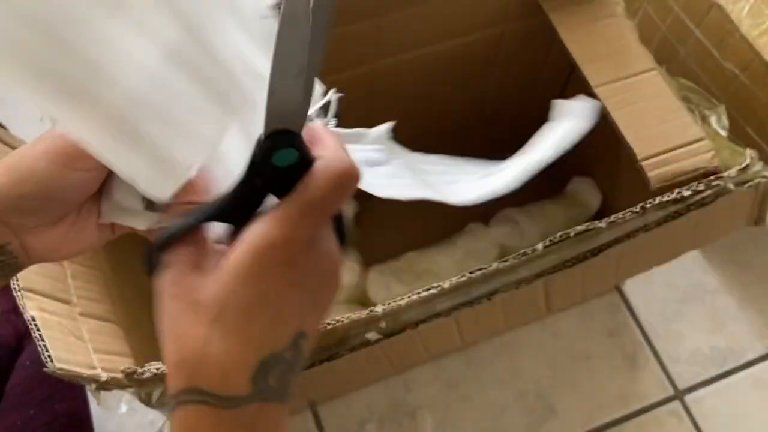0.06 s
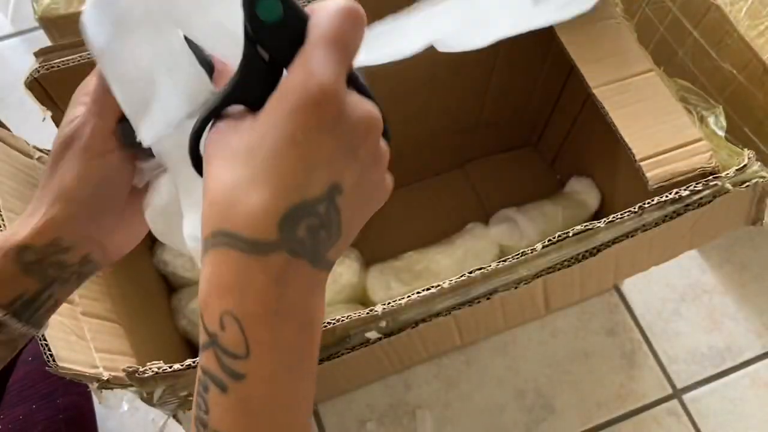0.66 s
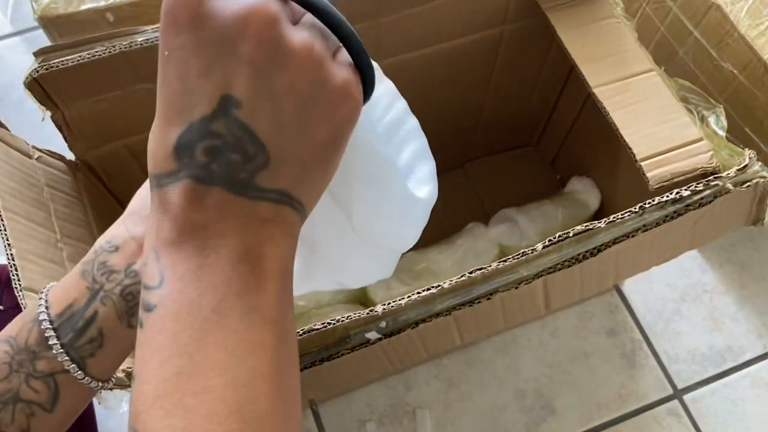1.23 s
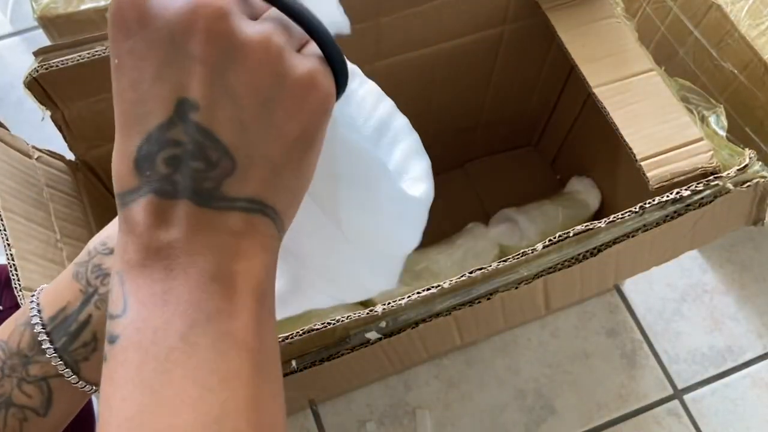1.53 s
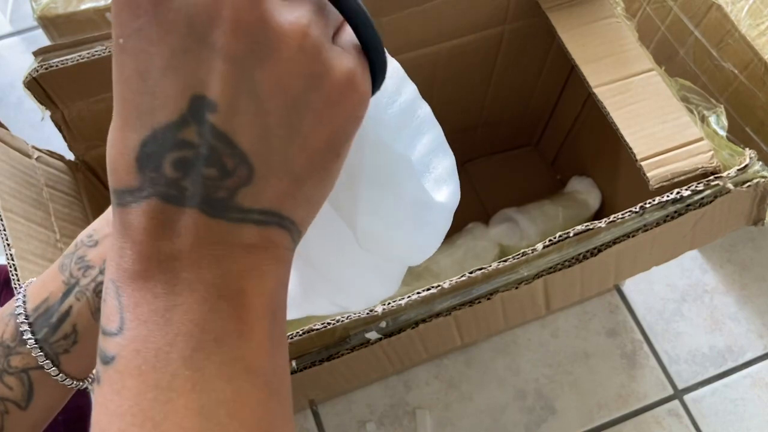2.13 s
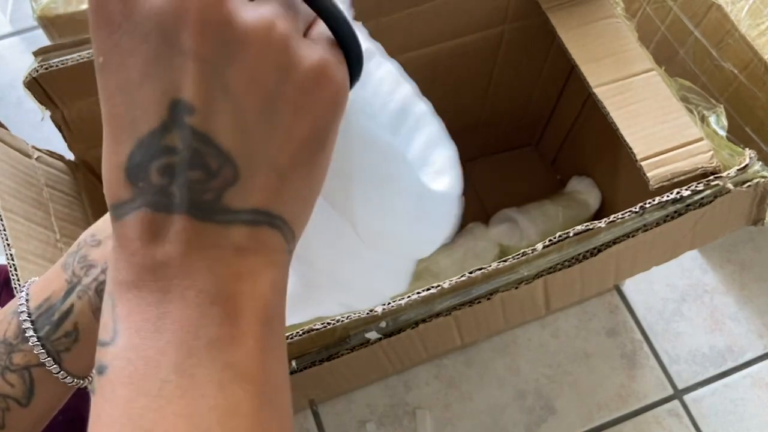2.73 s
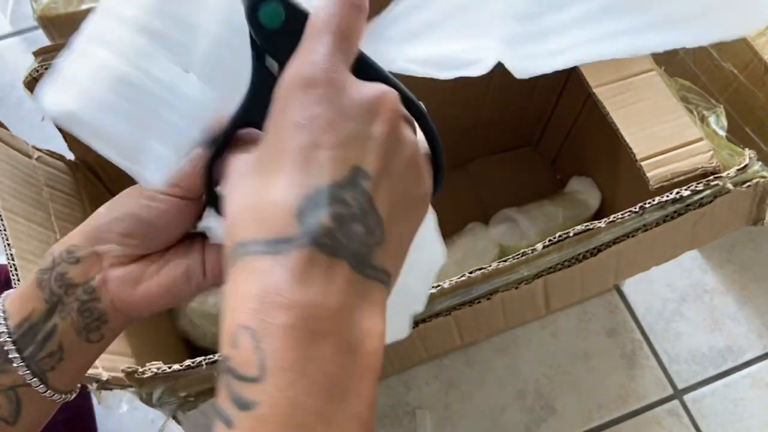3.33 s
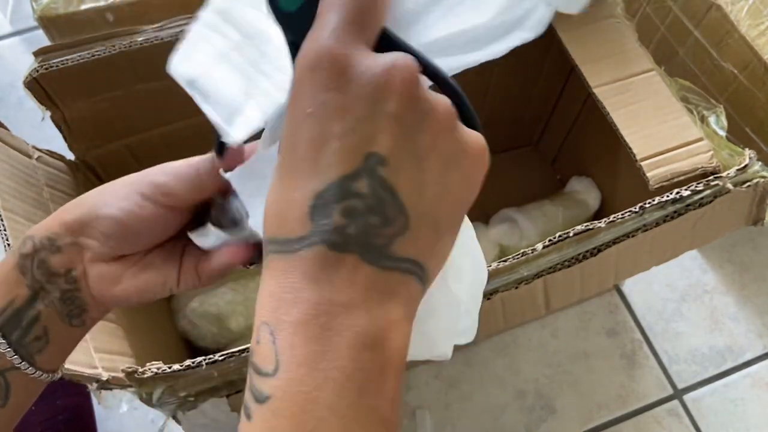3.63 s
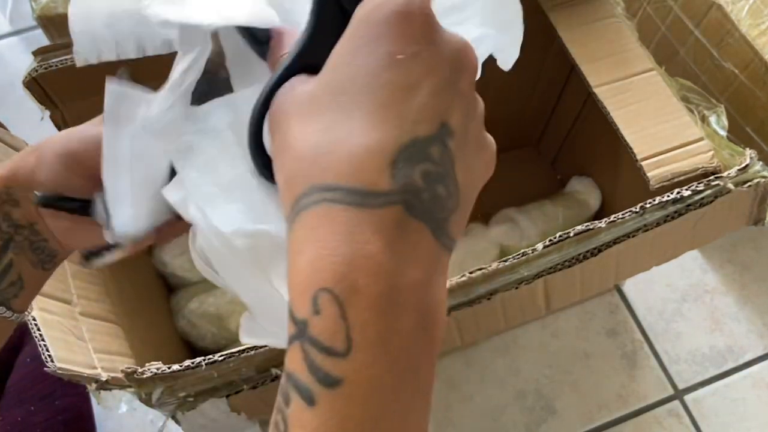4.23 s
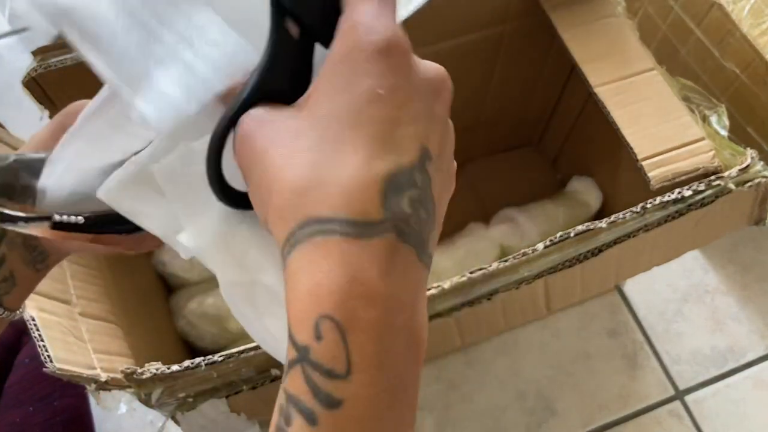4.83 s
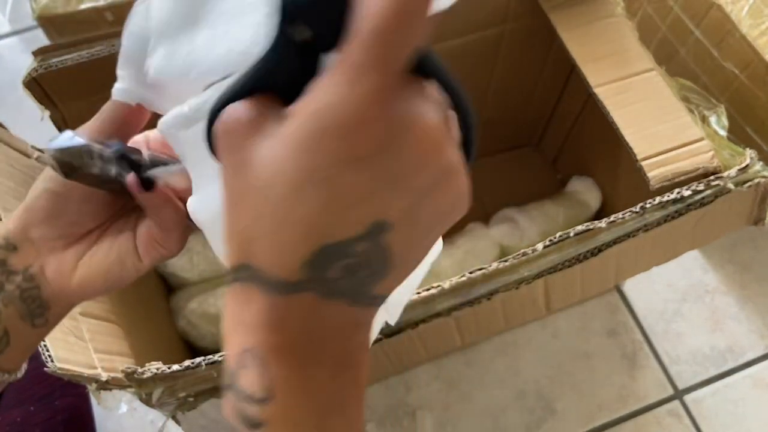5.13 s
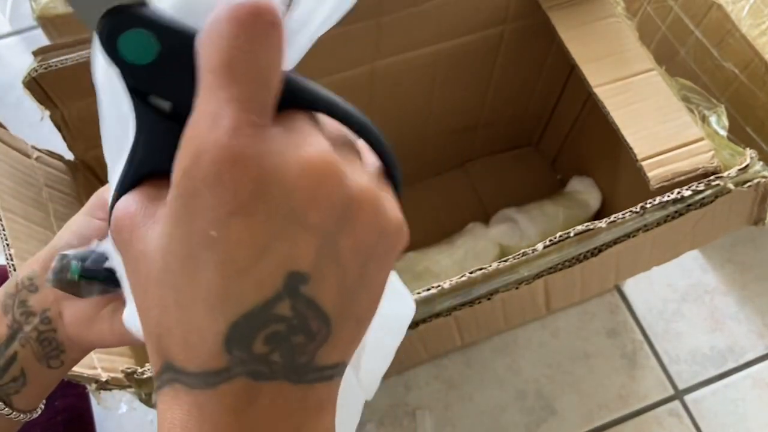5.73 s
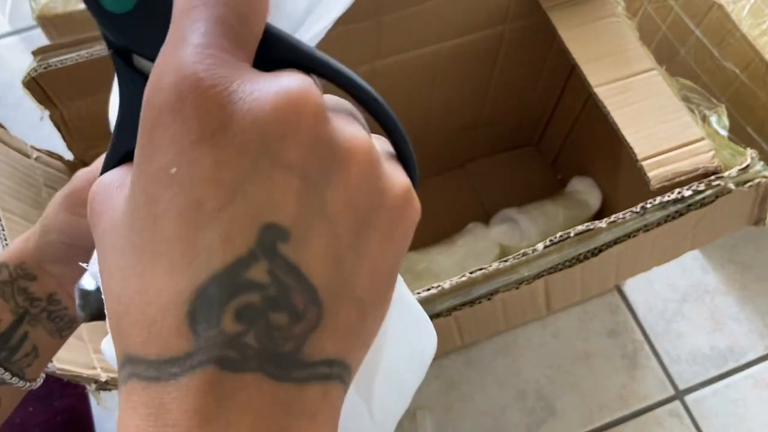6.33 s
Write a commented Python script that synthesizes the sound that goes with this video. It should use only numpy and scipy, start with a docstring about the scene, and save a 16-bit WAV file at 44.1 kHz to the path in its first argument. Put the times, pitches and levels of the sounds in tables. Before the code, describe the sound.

Hands pull and cut packing wrap in uneven, crackly rustles, with short scissor rasps and light knocks over a low rumble.

```python
"""Soft packing wrap rustles and crinkles over a low rumble of moving hands and a small room.
The wrap is snipped with scissors and worked off an item above a cardboard box. It rubs in tiny slips,
creases snap, blades and wrap rasp in short slides, slack folds pop over, and the item and scissors
tap hollowly. The box and the room ring a little, and the two microphone openings of a nearby phone
spread the sound between left and right."""
import sys
import numpy as np
from scipy import signal
from scipy.fft import rfft, irfft, next_fast_len
from scipy.io import wavfile
from scipy.ndimage import uniform_filter1d, map_coordinates

SR = 44100
rng = np.random.default_rng(int(sys.argv[2]) if len(sys.argv) > 2 else 0)


def transcribe(signal):
    """Save signal, clipped to [-1, 1], as a 16-bit WAV file at the path in sys.argv[1]."""
    frames = np.atleast_2d(signal).T
    limited = np.clip(frames, -1, 1)
    pcm = np.round(limited * 32767).astype(np.int16)
    wavfile.write(sys.argv[1], SR, pcm)


N = 280638
TIME = np.arange(N) / SR
FFT_SIZE = next_fast_len(N, True)
FREQS = np.maximum(np.fft.rfftfreq(FFT_SIZE, 1 / SR), 1)

# Levels compare the rows of one table; the functions set the final loudness.
# light rubbing of the held wrap between pulls: (time [s], level [dB])
LIGHT_RUB = [(0.0, -51), (0.33, -52.5), (0.52, -50), (0.88, -50.5), (0.96, -52.5), (1.0, -58),
             (1.06, -50.5), (1.13, -54), (1.4, -46), (1.64, -51.5), (1.72, -45.5), (1.79, -54), (1.88, -48),
             (2.02, -49), (3.18, -53), (3.54, -50.5), (4.08, -46), (4.25, -57), (4.72, -49), (5.1, -49.5),
             (5.2, -56), (5.8, -59), (5.9, -67), (6.0, -52.5), (6.12, -64.5), (6.2, -59), (6.36, -58)]
# pulls on the wrap, each swelling and dying away: (peak time [s], rise [s], fall [s], level [dB])
PULLS = [(0.165, 0.037, 0.039, -36.5), (0.227, 0.022, 0.051, -38), (0.384, 0.013, 0.02, -43),
         (0.43, 0.051, 0.029, -49.5), (0.595, 0.059, 0.05, -42.5), (0.7, 0.029, 0.14, -43.5),
         (0.854, 0.019, 0.025, -43.5), (1.181, 0.026, 0.025, -35.5), (1.33, 0.054, 0.02, -40.5),
         (1.42, 0.028, 0.083, -51.5), (1.555, 0.013, 0.026, -45), (1.945, 0.046, 0.16, -45.5),
         (2.075, 0.017, 0.055, -44.5), (2.35, 0.14, 0.076, -44.5), (2.481, 0.026, 0.027, -43),
         (2.58, 0.1, 0.12, -47.5), (2.76, 0.042, 0.029, -43.5), (2.906, 0.032, 0.043, -35.5),
         (3.049, 0.035, 0.053, -39), (3.088, 0.021, 0.013, -37.5), (3.279, 0.15, 0.054, -39.5),
         (3.415, 0.061, 0.048, -39.5), (3.614, 0.063, 0.11, -43.5), (3.86, 0.015, 0.048, -37.5),
         (3.992, 0.034, 0.036, -39), (4.141, 0.018, 0.0074, -49), (4.313, 0.027, 0.048, -43.5),
         (4.38, 0.045, 0.034, -47), (4.508, 0.042, 0.041, -44.5), (4.577, 0.022, 0.069, -38.5),
         (4.652, 0.03, 0.073, -40), (4.831, 0.042, 0.015, -44), (4.869, 0.015, 0.012, -37),
         (4.99, 0.1, 0.03, -49), (5.53, 0.037, 0.051, -51.5), (5.66, 0.028, 0.032, -50.5),
         (5.748, 0.032, 0.036, -48.5), (5.814, 0.03, 0.037, -49), (5.989, 0.058, 0.024, -51.5)]
# how slack or tight the wrap is held: (time [s], slack rustle [dB], tight hiss [dB])
HOLD = [(0.0, 3, 1), (0.3, -3.5, -8), (0.75, -3, -5), (0.98, -4.5, -12.5), (1.17, -4, -6.5),
        (1.35, -5, -12), (1.8, -6.5, -11.5), (2.3, -5, -13), (2.6, -1, -9), (2.9, -2, -10),
        (3.1, -0.5, -14), (3.4, -1.5, -6), (3.85, -3, -9.5), (3.99, 2, 0.5), (4.15, -3, -2.5),
        (4.48, -2, -0.5), (4.62, -1, -6), (5.05, 2, 0), (5.55, -2, -5.5), (6.36, -5.5, 0.5)]
# tone of rubbing wrap: (frequency [Hz], level [dB])
WRAP_TONE = [(120, 4), (230, -0.5), (350, -1.5), (520, 0), (850, 1.5), (1300, 0.5), (2000, -1),
             (2900, -0.7), (4200, -4.5), (5700, -6.5), (7000, -7), (9000, -4.5), (11700, -5.5), (14000, -7),
             (15700, -8.5)]
# tone of the rumble of hands and room: (frequency [Hz], level [dB])
RUMBLE_TONE = [(27, -46), (32, -2), (38, 6), (46, -3), (62, -0.5), (85, -6.5), (120, -14.5), (170, -18.5),
               (300, -25), (600, -55)]
# how that rumble rises and falls: (time [s], level [dB])
RUMBLE_LEVEL = [(0.0, -44.5), (1.0, -46), (2.1, -43), (3.15, -46), (3.3, -38), (3.45, -43.5), (4.8, -45),
                (5.0, -46.5), (5.1, -42), (5.25, -43.5), (6.36, -45.5)]
# tone of the steady room noise: (frequency [Hz], level [dB])
AIR_TONE = [(30, 19.5), (150, 11), (220, -10), (300, 13.5), (600, 14.5), (1000, -25), (4000, -30),
            (15000, -70)]
# creases that snap: (time [s], level [dB], pitch [Hz], bandwidth [share of pitch])
SNAPS = [(0.047, -39, 12000, 0.45), (1.659, -35.5, 3120, 0.18), (1.6622, -44, 3270, 0.6),
         (1.669, -46, 3000, 0.63), (2.547, -41, 2300, 0.9), (2.554, -40, 1800, 0.75),
         (2.58, -41, 2300, 0.3), (2.611, -49, 1700, 0.54), (2.683, -44.5, 2200, 0.9),
         (3.038, -37.5, 2200, 1.8), (3.1858, -33.5, 1940, 1.4), (3.322, -28, 11700, 0.11),
         (3.3398, -20, 11860, 0.12), (3.9235, -28.5, 7250, 1.3), (3.9804, -39, 2700, 0.66),
         (3.993, -32, 3500, 1.6), (4.0298, -26.5, 3800, 5.3), (4.194, -43, 7000, 2.1),
         (4.222, -38, 5000, 6.1), (4.2255, -36, 3900, 6.1), (4.305, -37.5, 3800, 3.3),
         (4.317, -42, 2600, 0.72), (4.502, -43, 2000, 3.5), (4.57, -32, 3200, 2.8), (4.638, -34, 3160, 0.5),
         (4.652, -33.5, 2380, 0.64), (4.68, -42, 2600, 0.81), (4.847, -34, 4400, 0.39),
         (4.8678, -36, 4570, 0.85), (4.9029, -31.5, 4300, 0.35), (5.064, -37, 2300, 0.97),
         (5.242, -46, 2945, 0.35), (5.52, -49, 2500, 0.91), (5.362, -36, 10300, 0.37),
         (5.616, -44.5, 5000, 2.4), (5.742, -38.5, 3560, 4.7)]
# slides of blade or wrap:
# (middle time [s], length [s], level [dB], pitch [Hz], bandwidth [share of pitch])
SLIDES = [(0.067, 0.019, -14, 13400, 0.38), (0.066, 0.0084, -21.5, 5200, 1.2),
          (0.217, 0.014, -26, 3000, 2.2), (0.432, 0.015, -35, 3000, 1.2), (1.172, 0.006, -29, 1900, 3.4),
          (1.267, 0.02, -30.5, 2180, 2.6), (1.501, 0.015, -31, 1410, 1.2), (2.077, 0.025, -34, 1500, 0.92),
          (2.349, 0.032, -34, 1210, 1.3), (2.478, 0.022, -32.5, 1530, 0.4), (2.556, .009, -32, 1800, 1.1),
          (2.752, .013, -32, 1550, 1.5), (2.911, .012, -33, 1700, 1.9), (3.229, 0.015, -16, 10500, 0.35),
          (3.23, 0.012, -19, 6550, 0.21), (3.234, 0.0095, -20.5, 2600, 0.76),
          (3.335, 0.0062, -25, 1150, 0.52), (3.984, 0.018, -24.5, 3440, 0.81),
          (4.139, 0.02, -33, 4050, 0.67), (4.57, 0.0083, -25, 4500, 1.6), (4.639, .006, -21, 3400, .7),
          (4.652, 0.0095, -22, 2420, 1.3), (4.679, .008, -26, 2300, 1), (4.789, 0.013, -32.5, 1090, 1),
          (4.832, 0.0071, -30, 1050, .9), (4.864, 0.017, -34, 4500, 1.4), (4.9, .004, -25, 5000, 1.6),
          (5.256, 0.014, -36.5, 2200, 1.6), (5.56, 0.02, -37, 2800, 1.6), (5.81, 0.023, -38, 1900, 1.6)]
# folds that pop over: (time [s], level [dB], pitch [Hz], thump offset [dB])
POPS = [(0.098, -34, 546, -19), (0.165, -36.5, 360, 4.5), (0.428, -50, 614, 18), (0.870, -41.5, 300, -3),
        (3.083, -33, 710, -4.5), (3.184, -38, 440, 0), (3.339, -29, 896, 3), (4.224, -40, 800, -6),
        (4.448, -39, 800, -7), (4.598, -29, 1170, -11), (4.7253, -28, 850, -18), (4.780, -32, 1420, -7),
        (5.387, -43.5, 735, -2), (5.418, -43, 734, -1), (5.52, -38.5, 945, -2)]
# taps of the item and scissors:
# (time [s], level [dB], pitch struck hardest [Hz], thump offset [dB], ring time the grip leaves [share])
TAPS = [(0.7495, -26.5, 373, -20, 0.98), (0.844, -29.5, 400, -16, 0.67), (3.3395, -24.5, 950, -13, .7),
        (3.9019, -22.5, 630, -23, 0.82), (3.904, -26, 160, -3.5, 0.9), (3.914, -25, 260, -8, .5),
        (3.9123, -26.5, 740, -13, .7), (4.601, -25.5, 800, -7, .7), (4.7865, -28.5, 1110, -12, 0.58),
        (4.8675, -25.5, 560, -16, 0.88), (4.902, -23, 420, -13, 0.69), (4.9545, -23.5, 500, -7, 0.61),
        (4.960, -24, 600, -19, 0.39), (5.063, -26.5, 524, 0, 0.62)]
# hollow tones that a tap rings with: (pitch [Hz], level [dB], time to fade by 60 dB when free [s])
TAP_TONES = [(154, -3, 0.099), (241, 5, 0.053), (304, -4.5, 0.056), (419, -5, 0.048), (497, -6.5, 0.056),
             (608, -1, 0.043), (770, 1.5, 0.043), (947, -3.5, 0.097), (1264, -1, 0.057), (1750, -2, 0.022)]
# how alike the two microphones sound: (frequency [Hz], likeness [0 to 1])
MIC_LIKENESS = [(40, 0.97), (130, 0.96), (400, 0.77), (1200, 0.6), (2200, 0.56), (3200, 0.48), (4400, 0.86),
                (5700, 0.42), (6800, 1), (9000, 1), (15000, 0.98)]
# which microphone is louder: (frequency [Hz], left minus right [dB])
MIC_BALANCE = [(50, -1.1), (130, 4), (300, 1.5), (650, 6), (1600, 3.5), (2700, 6), (4500, 3.5), (6000, 2),
               (7200, -0.5)]
# how far the wave at the left microphone is ahead: (frequency [Hz], lead [cycles])
MIC_LEAD = [(60, 0), (700, -.14), (2000, -.18), (3000, -.12), (3800, 0), (7500, 0), (8400, .43), (9100, .5),
            (9600, .57), (10600, .97), (11400, 1.01), (12800, 1.46), (13500, 1.52), (15000, 2)]


def undb(db):
    """Turn decibels into a gain to multiply by."""
    return 10 ** (np.asarray(db) / 20)


def unit(x):
    """Scale a signal to an average power of 1."""
    return x / np.sqrt(np.mean(x ** 2) + 1e-18)


def over_hz(points):
    """Join (frequency, value) points into a curve over all frequencies."""
    hz, value = np.transpose(points)
    return np.interp(np.log(FREQS), np.log(hz), value)


def colour(x, gain):
    """Shape the tone with one gain for each frequency."""
    return irfft(rfft(x, FFT_SIZE) * gain, FFT_SIZE)[..., :N]


def band(x, hz, width):
    """Keep the sound around one pitch; the width is a share of that pitch."""
    hz = min(hz, .4 * SR)
    sharpness = max(1 / width, hz / (.4 * SR))
    return signal.lfilter(*signal.iirpeak(hz, sharpness, fs=SR), x)


def wander(rate):
    """A curve that drifts to a new random value `rate` times a second."""
    step = max(int(SR / rate), 1)
    stairs = np.repeat(rng.standard_normal(N // step + 1), step)
    return unit(uniform_filter1d(stairs, step)[:N])


def add(out, start, sound):
    """Mix a short sound in at a start time in seconds."""
    i = max(int(start * SR), 0)
    out[..., i:i + sound.shape[-1]] += sound[..., :N - i]


def hand_effort():
    """How hard the hands rub the wrap, as a gain: light contact with the pulls on top."""
    power = undb(np.interp(TIME, *np.transpose(LIGHT_RUB))) ** 2
    for when, rise, fall, db in PULLS:
        t = np.arange(-3 * rise, 3 * fall, 1 / SR)
        from_peak = np.maximum(-t / rise, t / fall)
        swell = np.exp(-from_peak ** 1.48)  # a power of 1 is pointed, 2 is bell-shaped
        add(power, when + t[0], (undb(db) * swell) ** 2)
    return np.sqrt(power)


def slips(rate, spread_db, fade_s):
    """The loudness curve of tiny random slips, about `rate` a second, each dying at once."""
    size = undb(spread_db * np.minimum(rng.exponential(size=N), 5))
    happens = rng.random(N) < rate / SR
    power = signal.lfilter([1], [1, -np.exp(-1 / (fade_s * SR))], (size * happens) ** 2)
    return unit(np.sqrt(power))


def flex(x, depth_db=2.4, rate=45, patch_hz=170):
    """As the sheet bends, its many resonances come and go, so the papery tone keeps shifting."""
    hz, times, spectrum = signal.stft(x, SR, nperseg=1024)
    chance = rng.standard_normal((256, 256))
    grid = np.meshgrid(hz / patch_hz, times * rate, indexing="ij")
    patches = map_coordinates(chance, grid, order=1, mode="wrap")
    return signal.istft(spectrum * undb(depth_db * patches), SR)[1][:, :N]


def rubbing(effort, grip_db=1.79, even_rub=1.4, even_rustle=0.7):
    """Wrap drags over wrap in uneven steps: the slack sheet rustles low, tight wrinkles hiss higher up."""
    times, *levels = np.transpose(HOLD)
    slack_db, tight_db = (np.interp(TIME, times, level) for level in levels)
    grip = undb(grip_db * wander(45))
    wrinkles = flex((slips(rate=1400, spread_db=0, fade_s=.0007) + even_rub) * rng.standard_normal((2, N)))
    folds = (slips(rate=270, spread_db=4, fade_s=.0066) + even_rustle) * rng.standard_normal((2, N))
    # shares of the power that go to the slack sheet, its small wrinkles and the finest ones
    slack = 1 / (1 + (FREQS / 1300) ** 4)
    small = 1 / (1 + (2700 / FREQS) ** 4)
    finest = 1 / (1 + (6500 / FREQS) ** 5)
    tone = undb(over_hz(WRAP_TONE))
    rustle = undb(slack_db) * unit(colour(folds, tone * np.sqrt(slack)))
    middle = tone * np.sqrt((1 - slack) * (1 - finest))
    coarse = colour(wrinkles, middle * (1 - small))
    fine = undb(0.47 * tight_db + 3.5) * colour(wrinkles, middle * small)
    crackle = undb(-1.72 - 0.2 * wander(24)) * unit(coarse + fine)  # wavers as the contact shifts
    hiss = undb(tight_db + 2.5) * unit(colour(wrinkles, tone * np.sqrt(finest)))
    return grip * effort * (rustle + crackle + hiss)


def rumble(air_db=-64.5):
    """Moving hands and the room rumble low, over a faint steady room noise."""
    low = unit(colour(rng.standard_normal((2, N)), undb(over_hz(RUMBLE_TONE))))
    air = unit(colour(rng.standard_normal((2, N)), undb(over_hz(AIR_TONE))))
    return low * undb(np.interp(TIME, *np.transpose(RUMBLE_LEVEL))) + undb(air_db) * air


def crinkles(effort, rate, centre_hz, scatter, width, spread_db, gain_db, fade_cycles=2.9, usual_db=-42):
    """Small creases give way at random, each at its own pitch, louder the harder the wrap is worked."""
    out, t = np.zeros((2, N)), np.arange(SR // 50) / SR
    chances = rng.random((1200, 4))
    for place, pitch, size, luck in chances:
        noise = rng.standard_normal((2, len(t)))
        if luck < rate * N / SR / len(chances):
            hz = centre_hz * undb(scatter * (4 * pitch - 2))
            crack = band(noise * np.exp(-t * hz / fade_cycles), hz, width)
            db = usual_db + gain_db - spread_db * np.log(max(size, .05))
            force = (effort[int(place * N)] / undb(usual_db)) ** 0.9
            add(out, place * N / SR, undb(db) * force * crack / np.abs(crack).max())
    return out


def snaps(fade_cycles=5.2, shiver_db=-24, click_db=8, gain_db=4):
    """A crease gives way: a sharp click, a short crack and a faint shiver of the sheet around it."""
    out, t = np.zeros((2, N)), np.arange(SR // 25) / SR
    shiver = undb(shiver_db) * np.exp(-t / .006)
    for when, db, hz, width in SNAPS:
        fade = np.exp(-t * hz / fade_cycles)  # small, bright creases are the briefest
        crack = rng.standard_normal((2, len(t))) * (fade + shiver)
        crack[0, 0] += undb(click_db)
        crack = band(crack, hz, width)
        start_level = np.sqrt(np.mean(crack[:, :SR // 1000] ** 2, axis=1, keepdims=True))
        add(out, when, undb(db + gain_db) * crack / start_level)
    return out


def slides(gain_db=-11):
    """A blade or the wrap slides quickly: a dense run of slips that swells and stops."""
    out = np.zeros((2, N))
    roughness = slips(rate=4000, spread_db=1.5, fade_s=.0004)
    for when, length, db, hz, width in SLIDES:
        t = np.arange(-length, length, 1 / SR)
        friction = rng.standard_normal((2, len(t))) * roughness[int(when * SR):][:len(t)]
        rasp = unit(band(band(friction, hz, width), hz, width))
        swell = np.exp(-(2 * t / length) ** 2)
        add(out, when - length, undb(db + gain_db) * rasp * swell)
    return out


def pops(lag_cycles=0.99, fade_cycles=1.9, width=1.15, thump_db=-2, gain_db=3):
    """A fold flips over: bending waves bring the highs before the lows, and the whole sheet thumps."""
    out, t = np.zeros((2, N)), np.arange(SR // 10) / SR
    for when, db, hz, offset_db in POPS:
        for part_hz, part_db in [(hz / 2, -8), (hz, 0), (hz * 2, -10)]:
            push = rng.standard_normal((2, len(t))) * np.exp(-t * part_hz / fade_cycles)
            wave = band(band(push, part_hz, width), part_hz, width)
            wave /= np.abs(wave).max(axis=1, keepdims=True)
            add(out, when + lag_cycles / part_hz, undb(db + gain_db + part_db) * wave)
        add(out[0], when + 0.0059, undb(db + offset_db + thump_db) * thump(t))
    return out


def thump(t, usual_hz=80, swell_s=0.0068):
    """The whole sheet heaves once, at a slightly different low pitch each time."""
    hz = usual_hz * undb(rng.standard_normal())
    return np.sin(2 * np.pi * hz * t) * t / swell_s * np.exp(1 - t / swell_s)


def taps(attack_s=0.00066, lag_cycles=0.72, reach_octaves=0.75, thump_db=-2, clack_db=-7):
    """The item or scissors tap: a dry clack starts hollow tones, which the grip detunes and damps."""
    out, t = np.zeros((2, N)), np.arange(SR // 8) / SR
    tone_hz, tone_db, ring_s = np.transpose(TAP_TONES)[:, :, None]
    age = np.maximum(t - lag_cycles / tone_hz, 0)  # low tones start a little late
    # the direct sound keeps the tones more in step, the scattered sound scrambles them
    scramble = np.array([.5, 1])[:, None, None]
    for when, db, hz, offset_db, ring_share in TAPS:
        envelope = undb(-60 * age / (ring_s * ring_share)) * (1 - np.exp(-age / attack_s))
        # tones near the struck pitch ring most; a softer touch favours the low ones
        strength = undb(tone_db) / (1 + np.abs(np.log2(tone_hz / hz) / reach_octaves) ** 3)
        pitch = tone_hz * undb(0.7 * rng.standard_normal(tone_hz.shape))
        cycles = pitch * age + rng.random((2, len(TAP_TONES), 1)) * scramble
        ring = np.sum(strength * envelope * np.sin(2 * np.pi * cycles), axis=1)
        add(out, when, undb(db) * ring / np.sqrt(np.sum(strength ** 2)))
        hit = rng.standard_normal((2, len(t))) * np.exp(-t / 0.0023)
        clack = band(hit, hz=1700, width=0.96)
        add(out, when, undb(db + clack_db) * clack / np.abs(clack).max())
        add(out[0], when + 0.0044, undb(db + offset_db + thump_db) * thump(t))
    return out


def box(x):
    """The open cardboard box under the hands adds one hollow resonance."""
    return x + band(x, hz=220, width=0.31)


def room(x, ring_s=0.19, echo_db=-12.5):
    """Box, floor and walls send back a short, dull echo."""
    t = np.arange(SR // 3) / SR
    tail = rng.standard_normal((2, len(t))) * undb(-60 * t / ring_s) * (t > .003)
    tail = band(tail / np.sqrt(np.sum(tail ** 2) / 2), hz=1300, width=5.2)
    return x + undb(echo_db) * signal.fftconvolve(x, tail, axes=1)[:, :N]


def microphones(x):
    """Direct and scattered sound reach the left and right openings with unequal level and timing."""
    likeness = np.clip(over_hz(MIC_LIKENESS), 0, 1)
    direct, scattered = rfft(x, FFT_SIZE) * np.sqrt([(1 + likeness) / 2, (1 - likeness) / 2])
    lean = undb(over_hz(MIC_BALANCE) / 2) * np.exp(1j * np.pi * over_hz(MIC_LEAD))
    left, right = (direct + scattered) * lean, (direct - scattered) / lean
    return irfft(np.array([left, right]), FFT_SIZE)[:, :N]


def scene():
    """Wrap and scissors over the box, in the room. Each source has two rows: direct and scattered."""
    effort = hand_effort()
    crisp = crinkles(effort, rate=120, centre_hz=3080, scatter=4, width=.57, spread_db=1.5, gain_db=1.5)
    dull = crinkles(effort, rate=45, centre_hz=1013, scatter=2.5, width=.21, spread_db=2.5, gain_db=-1.5)
    unwrapping = rubbing(effort) + crisp + dull + snaps() + pops() + taps() + slides()
    return microphones(room(box(unwrapping)) + rumble())


def record(dry, top_hz=15800):
    """The phone cuts off the highest treble."""
    return signal.sosfilt(signal.ellip(10, .2, 70, top_hz, fs=SR, output="sos"), dry)


dry = scene()
out = record(dry)
transcribe(out)
```